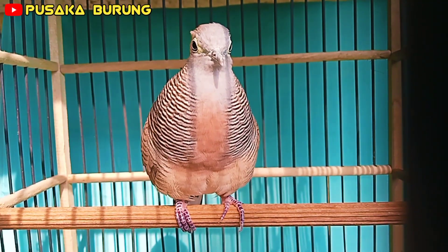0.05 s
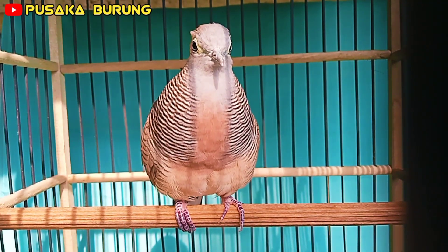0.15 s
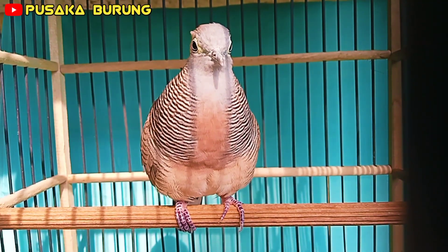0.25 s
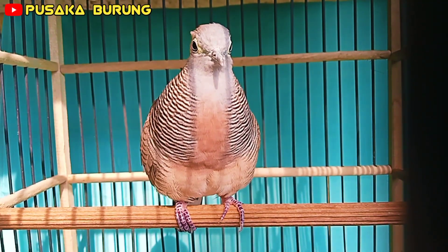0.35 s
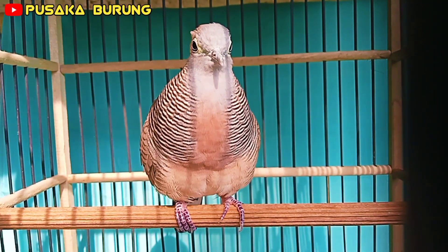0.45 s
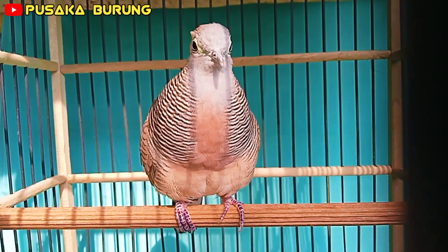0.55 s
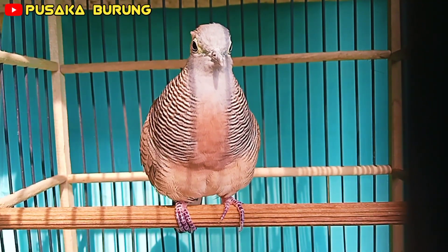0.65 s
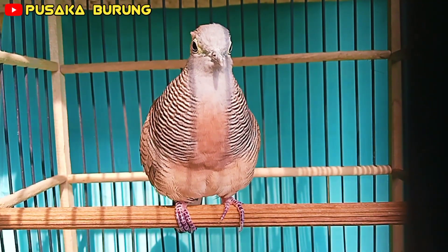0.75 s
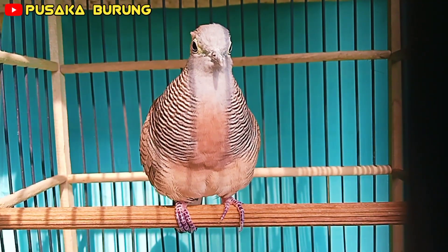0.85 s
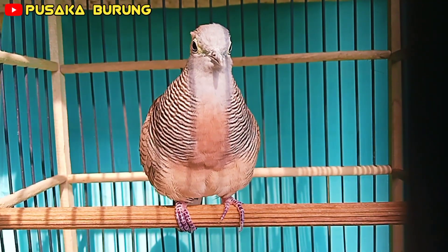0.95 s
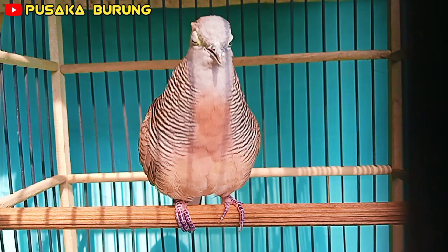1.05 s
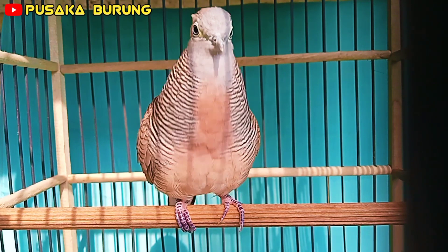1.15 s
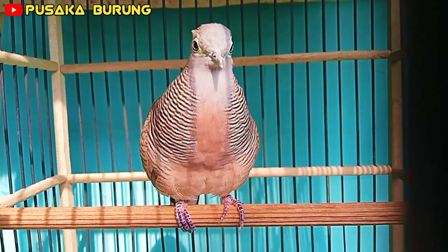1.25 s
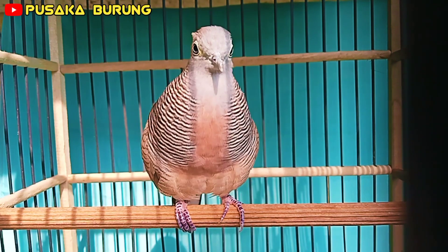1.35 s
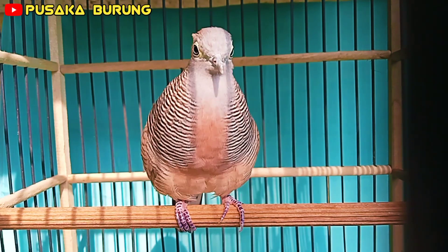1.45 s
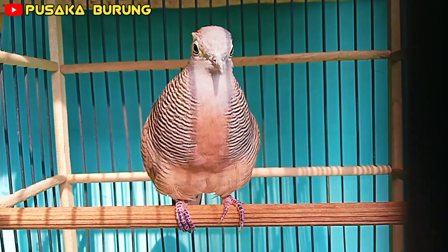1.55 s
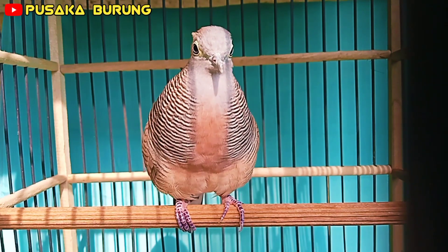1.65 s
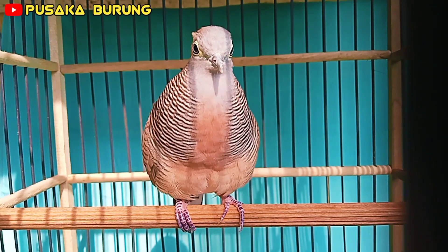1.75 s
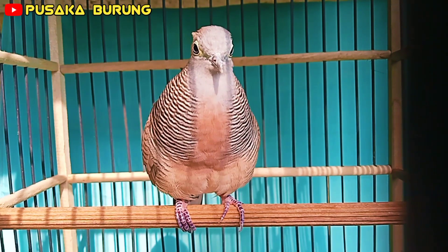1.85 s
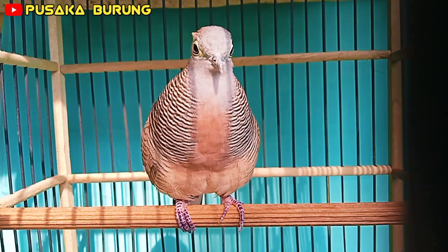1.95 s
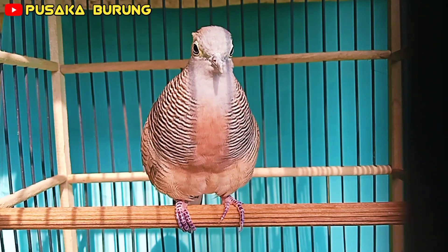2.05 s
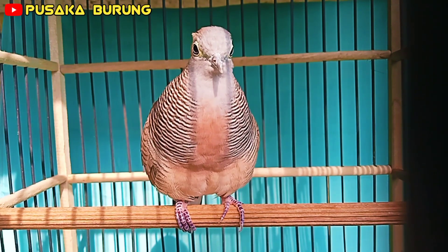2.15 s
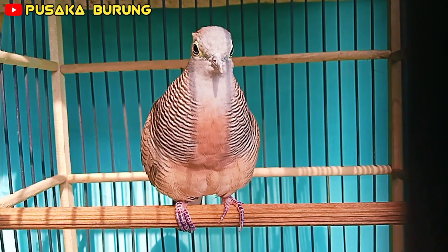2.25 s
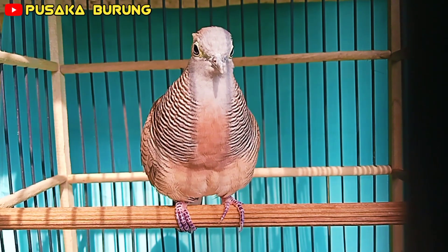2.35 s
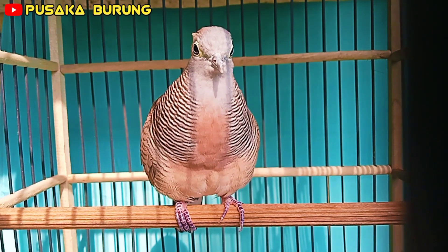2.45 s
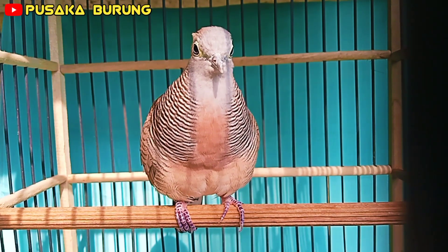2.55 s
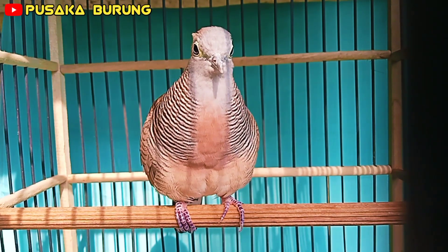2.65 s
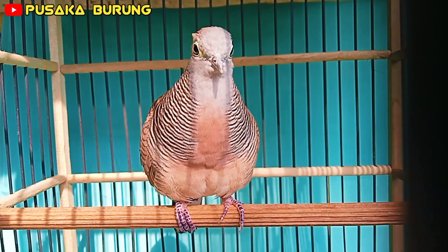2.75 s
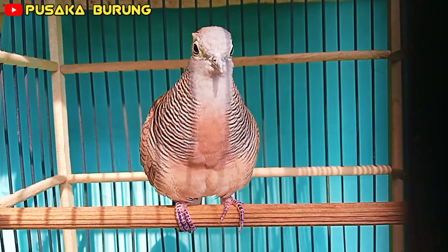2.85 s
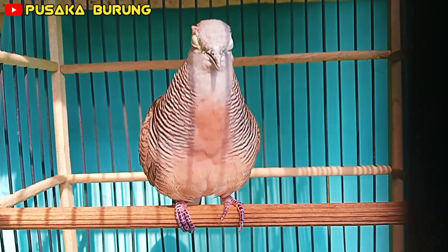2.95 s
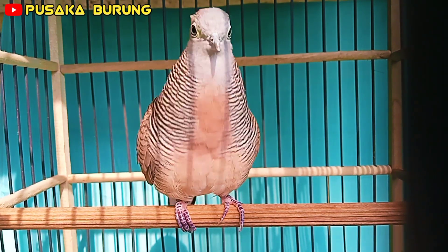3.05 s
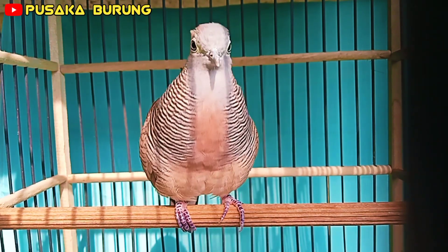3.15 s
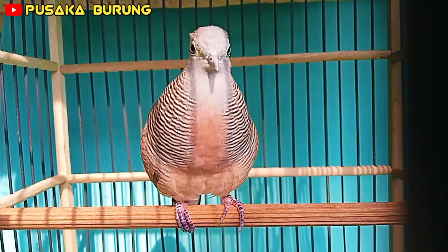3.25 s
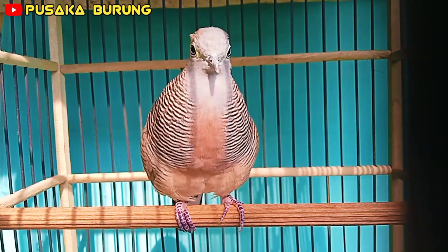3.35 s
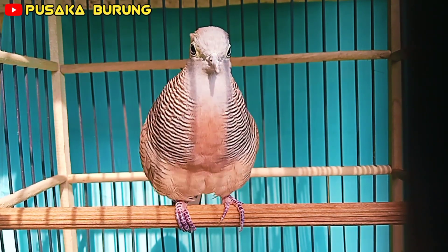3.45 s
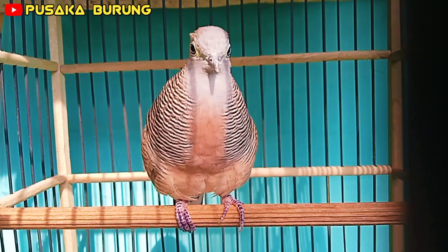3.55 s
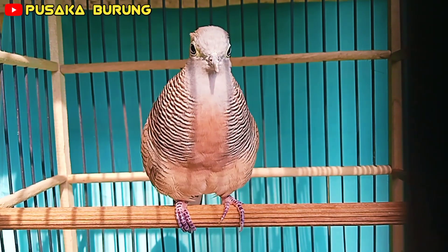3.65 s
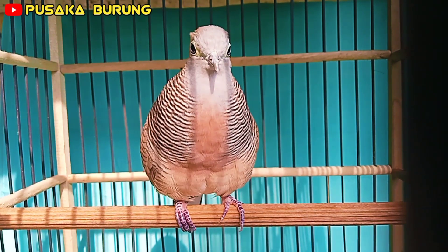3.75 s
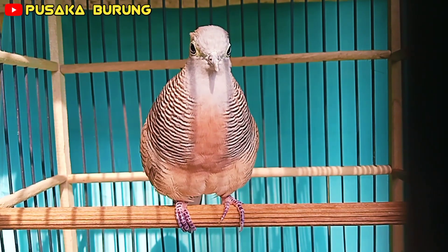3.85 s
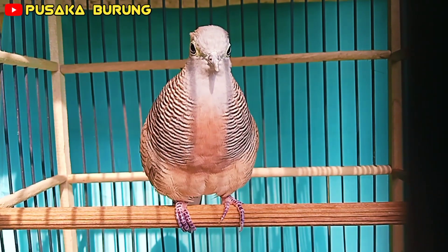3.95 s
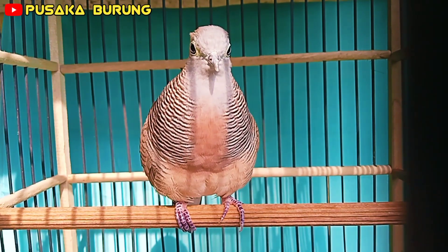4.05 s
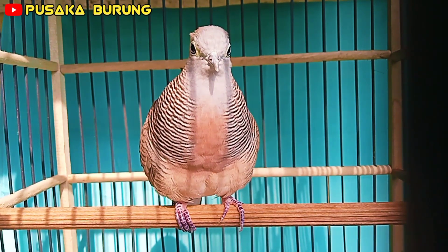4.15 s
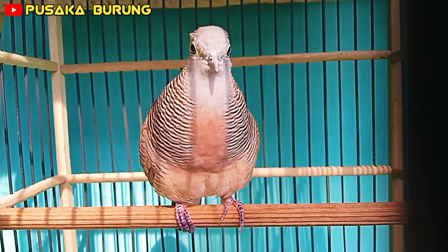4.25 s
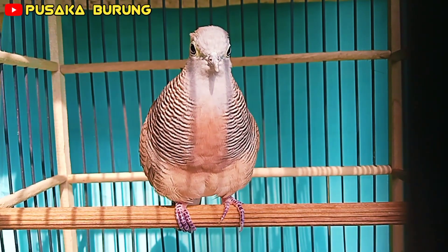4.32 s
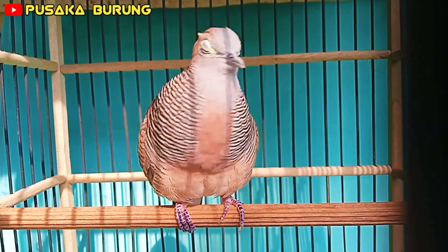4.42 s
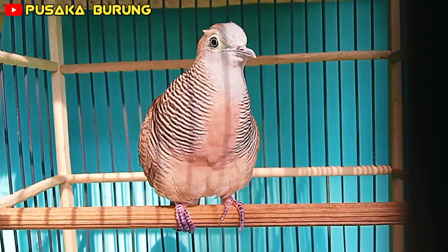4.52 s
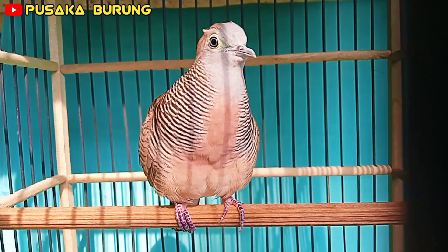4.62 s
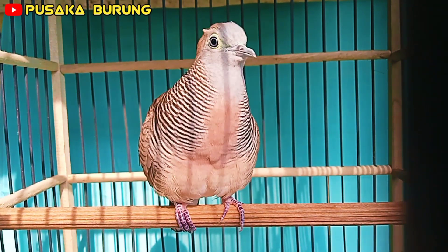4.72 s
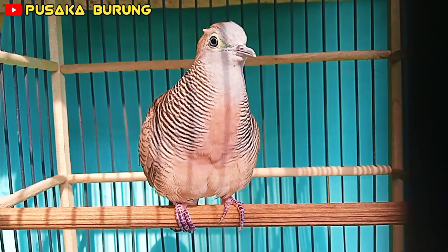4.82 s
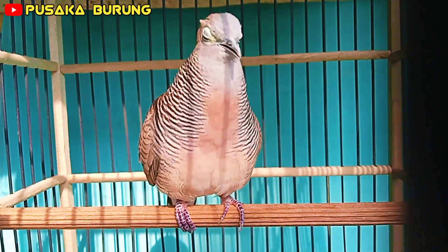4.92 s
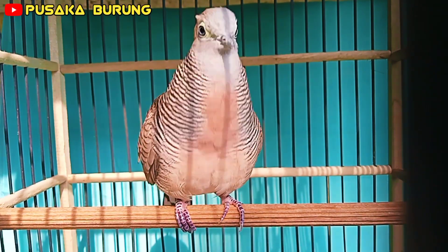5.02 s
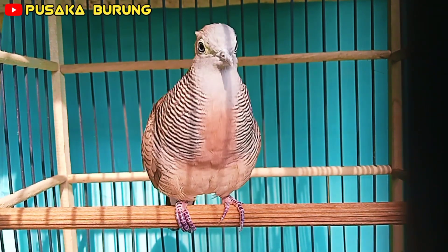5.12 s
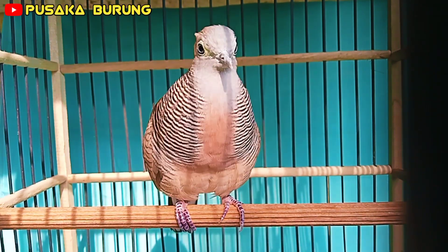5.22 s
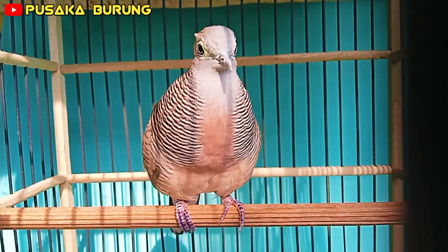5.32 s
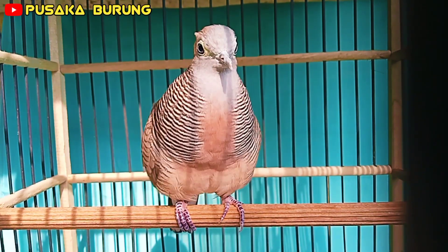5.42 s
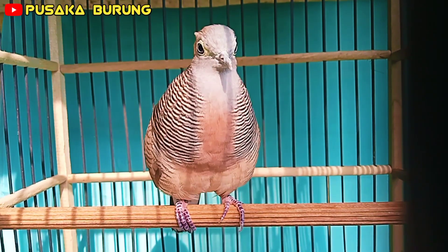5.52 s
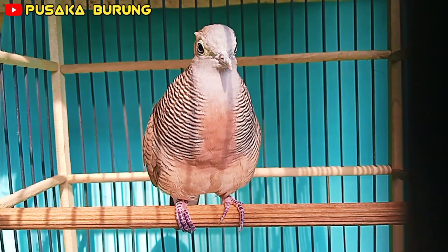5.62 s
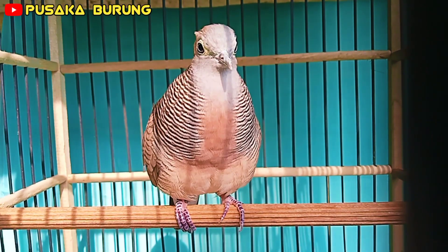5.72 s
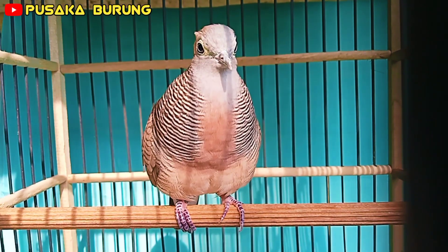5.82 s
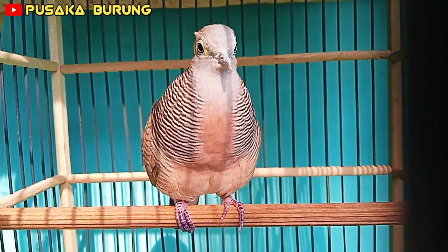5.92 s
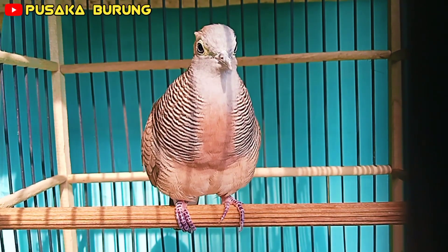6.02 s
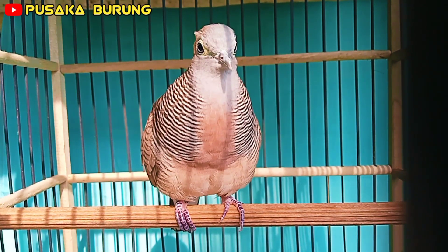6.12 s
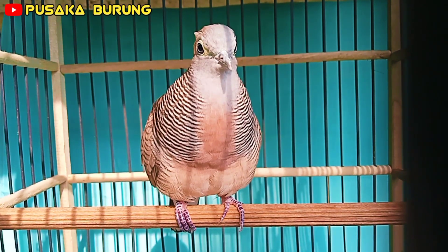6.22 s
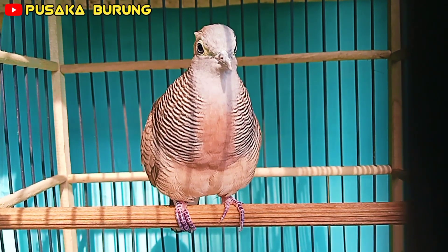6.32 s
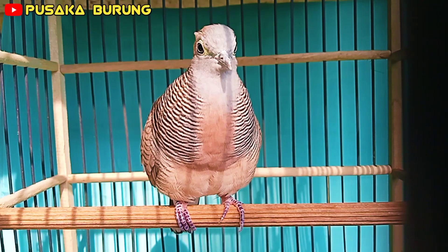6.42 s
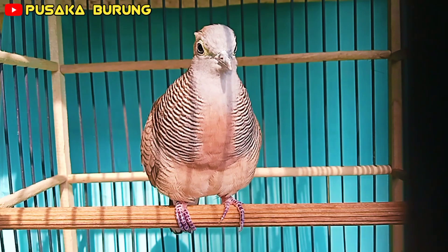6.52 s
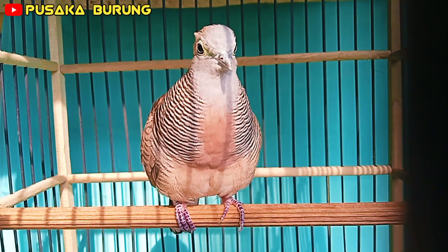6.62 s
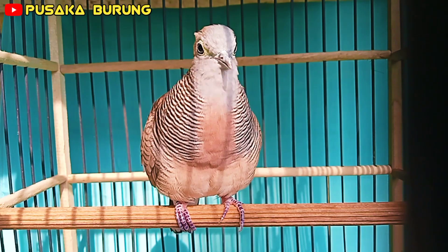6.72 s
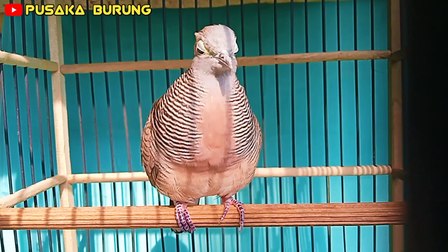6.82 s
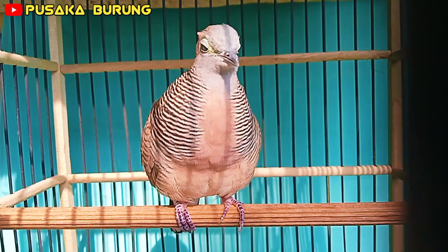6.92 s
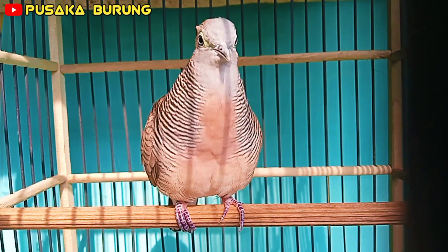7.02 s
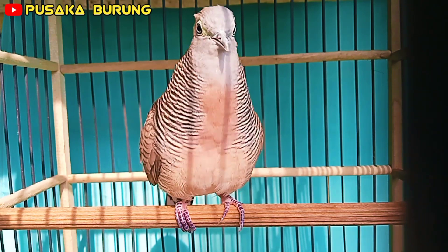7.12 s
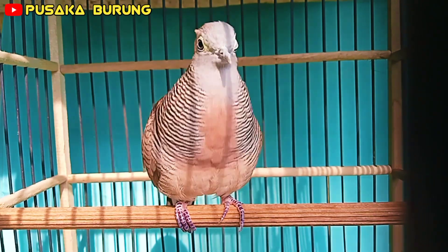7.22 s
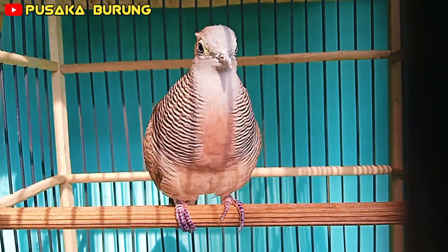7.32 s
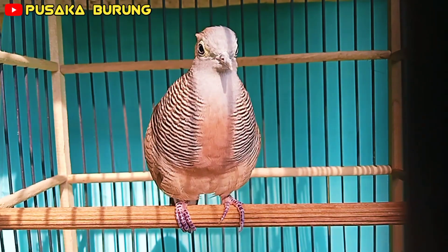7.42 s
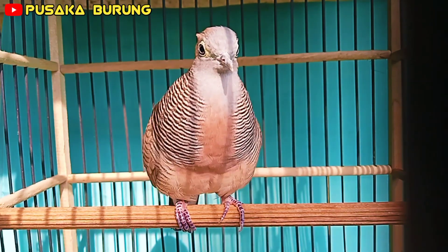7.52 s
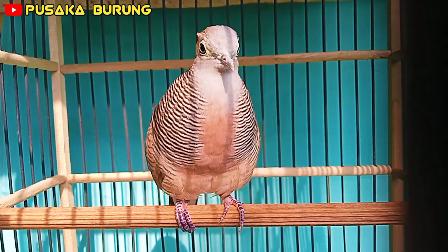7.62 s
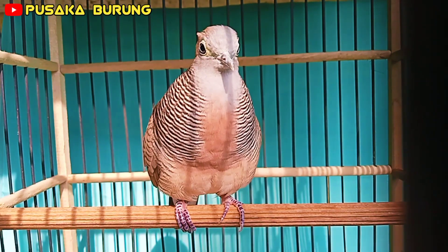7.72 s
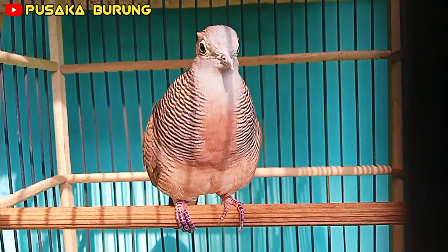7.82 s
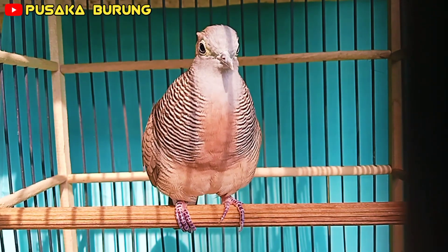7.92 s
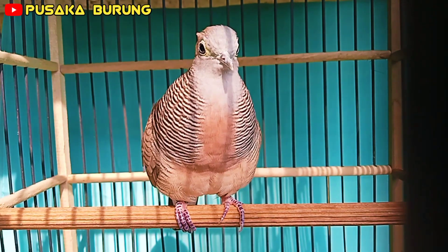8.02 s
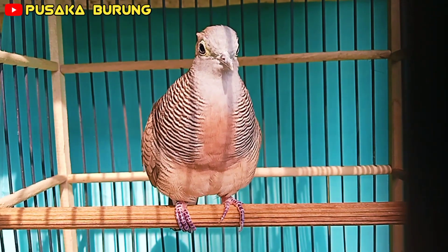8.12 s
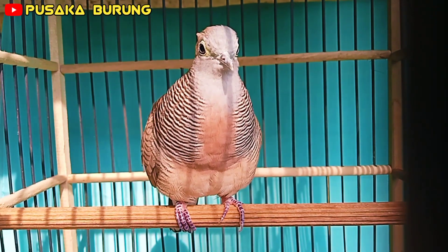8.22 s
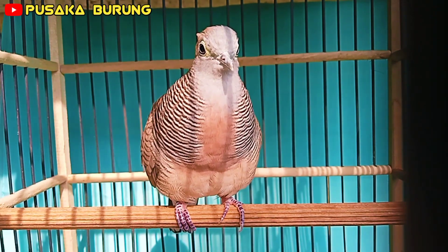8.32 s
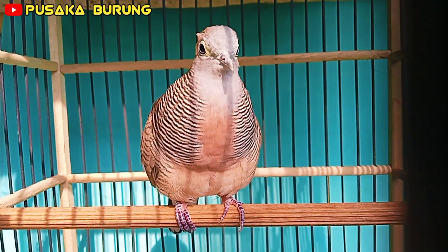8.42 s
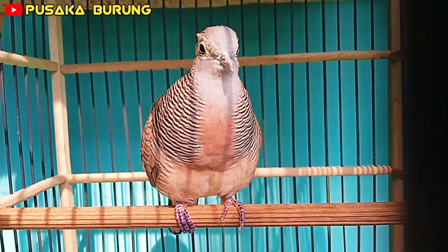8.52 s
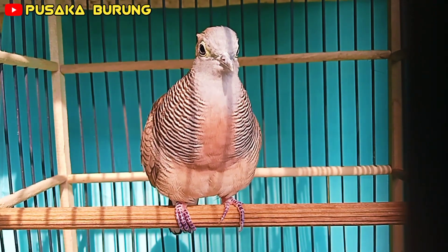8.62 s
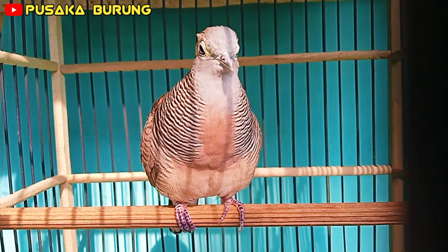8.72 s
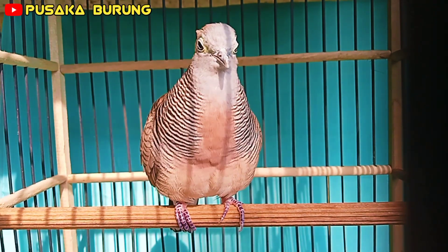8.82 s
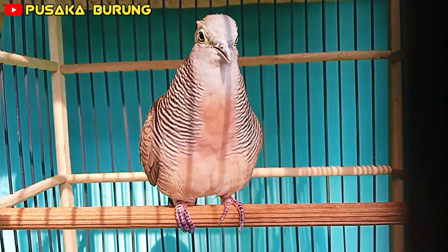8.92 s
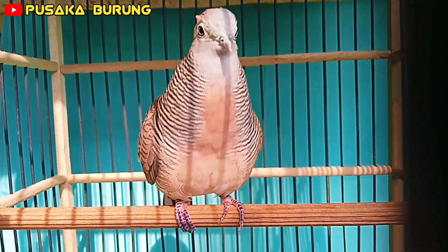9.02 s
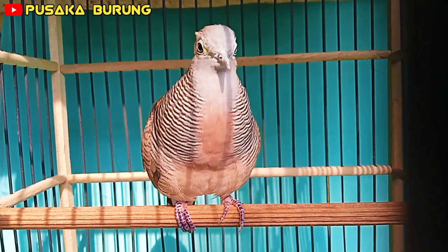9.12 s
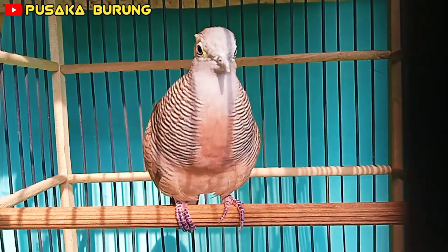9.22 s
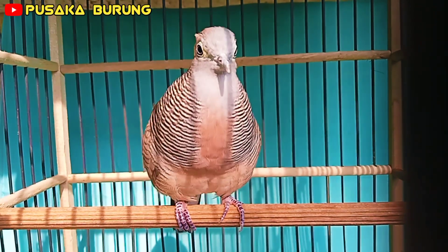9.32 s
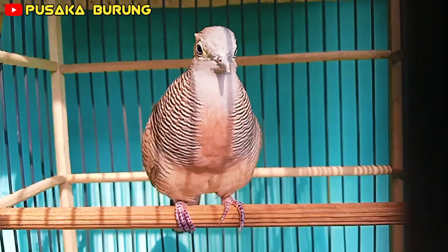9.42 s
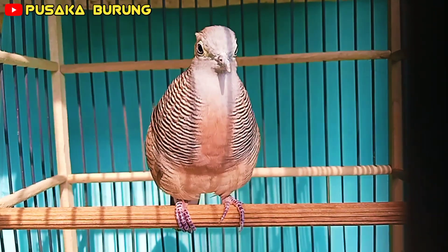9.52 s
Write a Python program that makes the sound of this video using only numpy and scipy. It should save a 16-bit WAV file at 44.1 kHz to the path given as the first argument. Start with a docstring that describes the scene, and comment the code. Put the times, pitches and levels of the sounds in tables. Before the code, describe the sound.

A zebra dove repeats a long falling coo and three quick ones up close, while another answers over insect hiss and faint birds.

```python
"""First comes a hiss of insects over low town rumble, with soft, even coos and a few scuffs in a cage.
Then, close to the microphone, a zebra dove on its perch sings a long falling coo and three quick ones,
five times over, and the second dove answers. In each coo the syrinx rattles until pressure has raised
the pitch, then sings clean. Out beyond the cage small birds whistle, a larger dove and a rooster call
far off, and something clanks and slaps."""
import sys
import numpy as np
from scipy import signal
from scipy.fft import rfft, irfft, next_fast_len
from scipy.io import wavfile
from scipy.ndimage import uniform_filter1d, minimum_filter1d, map_coordinates

SR = 44100
rng = np.random.default_rng(int(sys.argv[2]) if len(sys.argv) > 2 else 0)


def waveform_to_disk(signal):
    """Save audio, clipped to [-1, 1], as 16-bit WAV at the path in sys.argv[1]."""
    frames = np.transpose(np.atleast_2d(signal))
    scaled = np.clip(frames, -1, 1) * 32767
    samples = np.round(scaled).astype(np.int16)
    wavfile.write(sys.argv[1], SR, samples)


N = 421596


def amp(db):
    """Decibels to gain."""
    return 10 ** (np.asarray(db) / 20)


def unit(x):
    """x at rms 1."""
    return x / np.sqrt(np.mean(x ** 2) + 1e-20)


def along(points, hz):
    """(Hz, value) points read on a log axis."""
    f, v = np.transpose(points)
    return np.interp(np.log(hz + 1), np.log(f + 1), v)


def clock(length):
    """Sample times of a sound of this length."""
    return np.arange(int(length * SR)) / SR


def add(track, s, sound):
    """Mix a sound into a track at time s."""
    start = min(round(s * SR), N)
    sound, start = sound[max(-start, 0):], max(start, 0)
    track[start:start + len(sound)] += sound[:N - start]


def wobble(rate, size):
    """A smooth random curve, rate knots a second."""
    knots = rng.standard_normal(int(size * rate / SR) + 4)
    return map_coordinates(knots, [np.arange(size) * rate / SR])


def filtered(x, response):
    """x times a complex response of frequency."""
    m = next_fast_len(len(x) + SR // 4)
    return irfft(rfft(x, m) * response(np.fft.rfftfreq(m, 1 / SR)), m)[:len(x)]


def resonance(f, hz, width):
    """Causal response of one resonance."""
    return 1j * f * width / (hz * hz - f * f + 1j * f * width)


def noise(spectrum, size):
    """Coloured noise of rms 1."""
    return unit(filtered(rng.standard_normal(size), lambda f: amp(along(spectrum, f))))


def band(hz, width, size):
    """Noise of rms 1 around one frequency."""
    return unit(filtered(rng.standard_normal(size), lambda f: resonance(f, hz, width) ** 2))


def patchy(x, depth_db):
    """x at rms 1, with slow random patches of gain in time and frequency."""
    z = signal.stft(x, nperseg=2048)[2]
    field = uniform_filter1d(rng.standard_normal(z.shape), size=3, axis=0)
    field = uniform_filter1d(field, size=8, axis=1)
    return unit(signal.istft(z * amp(depth_db * unit(field)), nperseg=2048)[1][:N])


def wall(x, delay, db):
    """x with one reflection off a nearby wall."""
    return filtered(x, lambda f: 1 + amp(db) * np.exp(-2j * np.pi * f * delay))


# The yard around the cage. Each row: frequency in Hz, seconds to fade by 60 dB at a stretch of 1.
YARD_DECAY = [(200, 0.19), (1200, 0.22), (5000, 0.13), (12000, 0.033)]


def yard_echo(x, stretch):
    """The yard's diffuse answer; a larger stretch rings longer."""
    hz, t, z = signal.stft(rng.standard_normal(SR), SR, nperseg=256)
    t60 = stretch * along(YARD_DECAY, hz)[:, None]
    tail = signal.istft(z * amp(-60 * t / t60), SR, nperseg=256)[1]
    return signal.fftconvolve(x, np.pad(tail, (300, 0)) / np.linalg.norm(tail))[:N]


# The town in the distance. Each row: frequency in Hz, relative level in dB.
TOWN_SPECTRUM = [(15, -60), (25, -28.5), (81, 2.5), (222, -10.5), (330, -13), (364, -14.5), (459, -13),
                 (660, -12.5), (753, -16), (1300, -21), (1690, -50.5), (2860, -120)]
# The open air around the microphone. Each row: time in seconds, relative level in dB.
HUSH_LEVELS = [(0.0, -62.5), (0.19, -73), (0.28, -59), (0.42, -65), (1.02, -61.5), (1.25, -68.5),
               (1.9, -71), (2.37, -61.5), (2.88, -72.5), (2.93, -66.5), (3.72, -68), (3.81, -58.5),
               (4.09, -67.5), (5.02, -66), (7.8, -65.5), (8.27, -62.5), (8.41, -68.5), (9.57, -68.5)]


def town_air():
    """Low town rumble under a drifting airy hush."""
    low_noise = filtered(noise(TOWN_SPECTRUM, N), lambda f: f * f / (f * f + 35 ** 2))
    rumble = amp(-56.5 + 2.4 * wobble(7, N)) * patchy(low_noise, depth_db=3)
    s, db = np.transpose(HUSH_LEVELS)
    hush_db = np.interp(np.arange(N) / SR, s, db) + 5
    hush_spectrum = [(60, -30), (300, 0), (1500, -1), (3500, .5), (5500, -1), (10000, -9), (15000, -13.5)]
    return rumble + amp(hush_db) * noise(hush_spectrum, N)


# Insects outside the cage. Each row: frequency in Hz, relative level in dB.
CHORUS_SPECTRUM = [(3530, -57), (6000, -34), (6420, -24.5), (6840, -8.5), (7490, -9.5), (7830, -4),
                   (9100, 2), (9740, -0.5), (9860, -5.5), (11300, -16), (12100, -41.5), (13300, -27.5),
                   (13400, -22.5), (14400, -29.5), (15500, -36)]
# Single insects among them. Each row: centre in Hz, width in Hz, level in dB.
INSECT_TRILLS = [(3496, 12, -69.5), (6890, 130, -66.5), (8680, 23, -59.5), (9100, 32, -56.5),
                 (9470, 33, -57), (13950, 60, -72)]


def insects():
    """A steady high chorus, narrow wavering trills and a faint lower hiss."""
    chorus = amp(-46 + .34 * wobble(4.6, N)) * patchy(noise(CHORUS_SPECTRUM, N), depth_db=3.5)
    trills = sum(amp(db + 2.2 * wobble(4, N)) * band(hz, width, N) for hz, width, db in INSECT_TRILLS)
    return chorus + trills + amp(-69) * band(3530, 500, N)


def rooster():
    """A faint hoarse crow from far off, of which the second and third harmonics carry."""
    out, t = np.zeros(N), clock(.64)
    attack_s, release_s = .04, .3
    f0 = np.interp(t, [0, .12, .32, .64], [665, 660, 665, 560]) * (1 + .03 * wobble(197.8, len(t)))
    phase = 2 * np.pi * np.cumsum(f0) / SR
    swell = np.clip(np.minimum(t / attack_s, (t[-1] - t) / release_s), 0, 1) ** .5
    harmonics = np.sin(2 * phase) + .8 * np.sin(3 * phase) + .2 * np.sin(4 * phase)
    add(out, 7.96, amp(-47.5) * swell * harmonics)
    return out


def glide(hz, db, waver, rasp):
    """A thin swelling tone that follows hz; rasp roughens it the further it slides."""
    size = len(hz)
    progress = np.arange(size) / size
    hz = hz * (1 + waver * wobble(90, size) + rasp * (1 - hz / hz[0]) * wobble(700, size))
    swell = np.sqrt(2 * np.clip(6 * np.minimum(progress, 1 - progress), 0, 1))
    return amp(db + 4 * wobble(70, size)) * swell * np.sin(2 * np.pi * np.cumsum(hz) / SR)


# A larger dove, far off. Each row: start and length in seconds, first and last pitch in Hz,
# relative level in dB.
FAR_DOVE_COOS = [(5.264, 0.037, 399, 423, -46.5), (5.706, 0.1, 288, 334, -43.5), (6.01, 0.1, 360, 392, -45),
                 (6.454, 0.08, 364, 391, -41)]


def far_dove():
    """Low coos that slide gently upward."""
    out = np.zeros(N)
    for s, length, start_hz, end_hz, db in FAR_DOVE_COOS:
        hz = np.interp(clock(length), [0, length], [start_hz, end_hz])
        add(out, s, glide(hz, db, waver=.01, rasp=0))
    return out


# Small birds beyond the cage. Each row: start and length in seconds, first pitch and final
# downward bend in Hz, relative level in dB.
CLEAR_WHISTLES = [(1.97, .15, 4600, 1650, -59), (2.14, .16, 5080, 250, -62), (2.3, .05, 5280, 350, -57),
                  (2.425, .09, 5600, 850, -53.5), (2.555, .13, 4760, 1800, -57.5),
                  (2.685, .2, 5100, 50, -70), (3.173, .065, 5250, 450, -58),
                  (3.682, .065, 5250, 470, -56.5), (3.753, 0.07, 3270, 300, -53.5),
                  (4.453, 0.14, 4180, 720, -60), (4.693, .12, 4400, 980, -57.5),
                  (4.97, 0.14, 4310, 1030, -52), (5.798, .4, 5280, 450, -61.5),
                  (6.298, .17, 5370, 1400, -52), (6.476, 0.13, 4380, 830, -55.5),
                  (7.401, .11, 5140, 840, -47), (7.837, 0.22, 4950, 550, -53.5),
                  (7.98, .16, 3500, 900, -54), (8.12, .09, 4800, 300, -52.5), (8.2, 0.15, 3750, 950, -55.5),
                  (8.88, .19, 5050, 900, -52)]


def small_birds():
    """Thin whistles that sag and then bend down, clear ones among fainter ones."""
    out = np.zeros(N)
    sag_hz_per_s, bend_s = 1200, .13
    draws = rng.random((round(N / SR), 3))  # about one faint whistle a second
    faint = [(a * N / SR, .07 + .15 * b, 3300 + 2200 * c, 800, -68) for a, b, c in draws]
    for s, length, start_hz, bend_hz, db in CLEAR_WHISTLES + faint:
        t = clock(length)
        bend = np.maximum(1 - (length - t) / min(bend_s, length), 0)
        hz = start_hz - sag_hz_per_s * t - bend_hz * bend ** 1.6
        add(out, s, glide(hz, db, waver=.007, rasp=.25))
    return out


# A metal piece outside the cage. Each row: mode in Hz, relative level in dB, seconds to fade by 60 dB.
METAL_MODES = [(1542, 7.5, 0.19), (1670, -5.5, 0.42), (3930, -0.5, 0.14), (4300, 2.5, 0.24),
               (5200, -14.5, .26), (5540, -16.5, 0.36), (6830, -7, 0.23), (7070, 4.5, 0.13),
               (8900, -1.5, .2), (10000, -6.5, 0.1), (10800, -15.5, 0.15), (11600, -14, 0.077),
               (12300, -24.5, .12)]
# Its contacts. Each row: start in seconds, relative level in dB.
CLANK_HITS = [(6.739, -30), (6.748, -25), (6.765, -38.5), (6.795, -38)]
# The body of the clank, then the slap after it. Each row: frequency in Hz, relative level in dB.
CLANK_SPECTRUM = [(150, -41), (350, -12.5), (480, -21), (620, 0), (780, 7), (1000, -9.5), (2500, -13),
                  (4300, -28.5), (5500, -16.5), (6200, -28), (11600, -36), (15000, -44.5)]
SLAP_SPECTRUM = [(88, -31), (150, -7), (462, -9), (618, -9.5), (736, -6), (827, 0), (912, -18),
                 (1040, -7.5), (2700, -5.5), (4390, 0.5), (7560, -5.5), (9180, 0.5), (15500, -26)]
# Dull knocks in the yard. Each row: start in seconds, level in dB, centre in Hz.
DULL_THUMPS = [(7.004, -27.5, 486), (7.46, -25.5, 424)]


def knocks():
    """A rattling clank, a sharp slap with a long wash, and dull thumps."""
    out, t = np.zeros(N), clock(1)
    fade = lambda t60: amp(-60 * t / t60)
    for s, db in CLANK_HITS:
        # the rattle smears each mode into a narrow band
        ring = sum(amp(level) * fade(t60) * band(hz, .018 * hz, len(t)) for hz, level, t60 in METAL_MODES)
        body = fade(.22) * noise(CLANK_SPECTRUM, len(t))
        add(out, s, amp(db) * (.5 * ring + 1.2 * body))
    wash, crack = amp(-23) * fade(.43), amp(-26) * fade(.03)
    add(out, 7.0045, (wash + crack) * noise(SLAP_SPECTRUM, len(t)))
    for s, db, hz in DULL_THUMPS:
        add(out, s, amp(db) * fade(.12) * band(hz, 430, len(t)))
    return out


# Scuffs inside the cage. Each row: start in seconds, relative level in dB, treble against mids in dB.
CAGE_SCUFFS = [(.318, -38, -21), (0.485, -39, -5), (.5094, -41, -13), (0.625, -36.5, -15),
               (1.1428, -45.5, 6.5), (1.184, -47, -7), (2.93, -43.5, 2.5), (2.953, -45.5, 0)]


def scuffs_and_ticks():
    """Soft scuffs and an even run of six dry ticks that swells and fades."""
    out, t = np.zeros(N), clock(.2)
    rise_s, scuff_t60, tick_t60, tick_gap_s = .0041, .13, .05, .121

    def touch(treble_db):
        return amp(-7) * (band(1500, 1000, len(t)) + amp(treble_db) * band(4200, 3500, len(t)))

    for s, db, treble_db in CAGE_SCUFFS:
        envelope = amp(db - 60 * t / scuff_t60) * (1 - np.exp(-t / rise_s))
        add(out, s, envelope * touch(treble_db))
    for k, swell in enumerate(np.hanning(6)):
        envelope = amp(-44 + 7 * swell - 60 * t / tick_t60)
        add(out, 2.0185 + k * tick_gap_s, envelope * touch(treble_db=-15))
    return out


def arch(t, top_hz, db, climb, fall, droop_hz, start_hz, attack_db, release_db):
    """Pitch and level of a coo: both climb with the pressure, hold, and droop as it is let go."""
    climbing = np.clip(1 - t / climb, 0, 1) ** 2
    falling = np.clip(1 - (t[-1] - t) / fall, 0, 1) ** 2
    hz = top_hz - (top_hz - start_hz) * climbing - droop_hz * falling
    return hz, db - attack_db * climbing ** 1.25 - release_db * falling ** 3


def syrinx(hz, db, throat, jitter, rasp, mellow_db):
    """One coo as (fundamental, overtones): it rattles until the pitch has climbed, then sings clean."""
    t = np.arange(len(hz)) / SR
    f0 = hz * (1 + jitter * wobble(250, len(t)))
    rattle = rasp * np.clip((950 - f0) / 250, 0, 1)
    gate = np.clip(np.minimum(t, t[-1] - t) / .0014, 0, 1)
    level = 2 ** .5 * amp(db) * gate * (1 + rattle * wobble(600, len(t)))
    phase = 2 * np.pi * np.cumsum(f0 * (1 + .2 * rattle * wobble(500, len(t)))) / SR
    # off the crest of pitch the pressure is lower; a negative mellow_db dims the upper overtones there
    crest = -minimum_filter1d(-f0, size=SR // 30)
    slack = np.clip((1 - f0 / crest) / .06, 0, 1)
    overtones = np.zeros(len(t))
    for k in range(2, 12):
        overtone_db = along(throat, k * f0) + mellow_db * slack * (k - 2.5) + 1.5 * wobble(60, len(t))
        overtones += amp(overtone_db) * np.sin(k * phase)
    return level * np.sin(phase), level * overtones


# The second dove, also near the microphone. Each entry: start of a song in seconds.
SONG_STARTS = [4.5175, 8.5765]
# Its song: a slow rise, three pips, two coos. Each row: offset and length in seconds,
# top pitch in Hz, level in dB, climb in seconds.
SONG_NOTES = [(0, .157, 1220, -19.5, .164), (0.228, 0.045, 1246, -20, 0.043),
              (0.3317, .052, 1254, -17.5, .047), (0.454, .086, 1270, -17, .044),
              (.635, .126, 1220, -19.5, .032), (0.8583, 0.152, 1247, -18, .038)]
# Its two runs of even coos. Each row: start and length in seconds, top pitch in Hz, level in dB.
EVEN_NOTES = [(.012, .168, 1210, -25.5), (0.282, .171, 1191, -28), (.561, 0.18, 1211, -28),
              (0.844, 0.17, 1205, -26.5), (5.618, 0.16, 1233, -17.5), (5.88, 0.17, 1227, -18),
              (6.155, 0.176, 1223, -18.5), (6.435, 0.17, 1227, -19), (6.706, 0.17, 1220, -19)]
# Its throat. Each row: frequency in Hz, overtone level against the fundamental in dB.
SECOND_OVERTONES = [(1200, 16), (1550, 20), (2000, -14), (2300, -25), (2480, -41.5), (3000, -32.5),
                    (3700, -47), (5000, -63)]


def second_dove():
    """Smooth coos, each opening with a husky scrape that is longer and louder before a slow climb."""
    out, scrape_t = np.zeros(N), clock(.1)
    even_climb_s = .046
    notes = [(start + s, *rest) for start in SONG_STARTS for s, *rest in SONG_NOTES]
    notes += [(*coo, even_climb_s) for coo in EVEN_NOTES]
    for s, length, top_hz, db, climb in notes:
        hz, level_db = arch(clock(length), top_hz, db, climb, fall=.035, droop_hz=88,
                            start_hz=742.7, attack_db=46.5, release_db=29)
        add(out, s, sum(syrinx(hz, level_db, SECOND_OVERTONES, jitter=.004, rasp=.6, mellow_db=0)))
        swell = np.exp(-.5 * ((scrape_t - scrape_t.mean()) / (.15 * climb)) ** 2)
        scrape = amp(-34.5 + 30 * climb + db / 2) * swell * band(1200, 480, len(swell))
        add(out, s - .043, scrape)
    return wall(out, delay=.03865, db=-30.5) + amp(-21.5) * yard_echo(out, stretch=.74)


# The near dove's throat. Each row: frequency in Hz, overtone level against the fundamental in dB.
NEAR_OVERTONES = [(900, -0.5), (1400, -10.5), (1900, -33), (2300, -34.5), (2500, -18.5), (2850, -47),
                  (3300, -29.5), (3500, -42.5), (3750, -27), (4350, -44.5), (4750, -36.5), (5500, -37),
                  (6200, -29), (6900, -49.5), (15000, -57.5)]


def near_coo(length, top_hz, db, climb, fall, droop_hz, tiring):
    """A note of the near dove: it surges as it catches; as it tires, pitch sags and a tremor grows."""
    t = clock(length)
    tiring_s, sag_hz = .12, 171.3
    tremor_rate_hz, dip_hz, dip_db = 28.7, 169, 16.5
    hz, level_db = arch(t, top_hz, db, climb, fall, droop_hz, start_hz=516, attack_db=28.5, release_db=36)
    tired = tiring * np.exp((t - length) / tiring_s)
    dips = tired ** 2 * np.sin(np.pi * tremor_rate_hz * t) ** 4
    hz = hz - sag_hz * tired - dip_hz * dips
    strain_db = .147 * np.maximum(hz - 1227.5, 0)  # the voice thins at the top of its range
    surge_db = 4 * (t < climb) * np.exp(-.5 * ((hz - 1023) / 62) ** 2)  # it catches near 1023 Hz
    level_db = level_db - dip_db * dips - strain_db + surge_db
    return syrinx(hz, level_db, NEAR_OVERTONES, jitter=.003, rasp=.55, mellow_db=-5)


# The zebra dove on its perch, close to the microphone. Each entry: start of a phrase in seconds.
PHRASE_STARTS = [1.3232, 3.22, 5.1728, 7.302, 9.1926]
# One long coo and three quick ones. Each row: offset and length in seconds, top pitch in Hz,
# relative level in dB, climb and fall in seconds, droop in Hz, tiring from 0 to 1.
PHRASE_NOTES = [(.001, .237, 1297, -16, .048, .012, 39.8, 0.99),
                (0.2348, .041, 1122, -19.5, .021, .019, 209.6, 0.02),
                (0.2942, .0424, 1109, -19, .026, .016, 218, 0),
                (.3845, 0.082, 1188, -18, .0265, .042, 230, 0.01)]


def near_dove():
    """Each upward sweep strikes a sharp resonance, which swells and then beats against the note."""
    tone, overtones, t = np.zeros(N), np.zeros(N), clock(.012)
    catch = amp(-53.5) * np.hanning(len(t)) * np.sin(2 * np.pi * 1000 * t)
    husk = amp(-29.5) * np.hanning(len(clock(.026)))
    for start in PHRASE_STARTS:
        # a tiny catch and a throaty rasp open the phrase
        add(tone, start - .048, catch)
        add(overtones, start - .008, husk * band(950, 430, len(husk)))
        for s, *shape in PHRASE_NOTES:
            low, high = near_coo(*shape)
            add(tone, start + s, low)
            add(overtones, start + s, high)
    voice = filtered(tone, lambda f: 1 + 4.1 * resonance(f, hz=968.5, width=67)) + overtones
    return wall(voice, delay=.021, db=-30.5) + amp(-24.5) * yard_echo(voice, stretch=.9)


def scene():
    """From the microphone: two doves close and nearly dry, the far birds with more of the yard's echo."""
    far_birds = rooster() + far_dove() + small_birds()
    distance = amp(-3.5) * far_birds + amp(-11) * yard_echo(far_birds, stretch=1.4)
    background = town_air() + insects() + distance + knocks() + scuffs_and_ticks()
    return (background + second_dove() + near_dove())[None]


def record(dry):
    """One microphone, into a recorder that keeps nothing above 15.6 kHz."""
    return filtered(dry[0], lambda f: f < 15600)[None]


dry = scene()
out = record(dry)
waveform_to_disk(out)
```